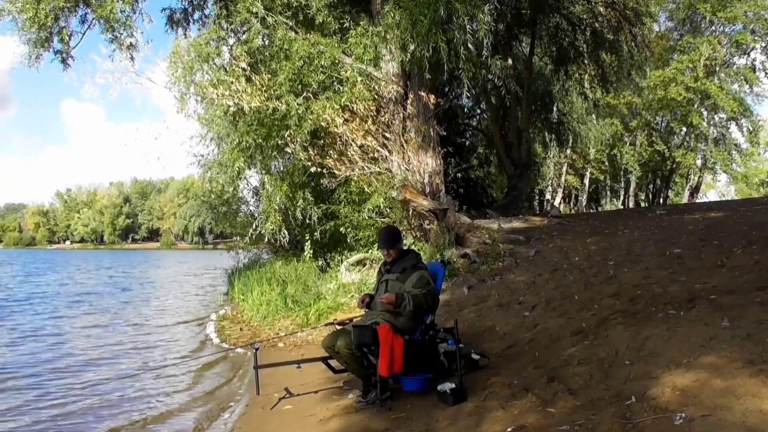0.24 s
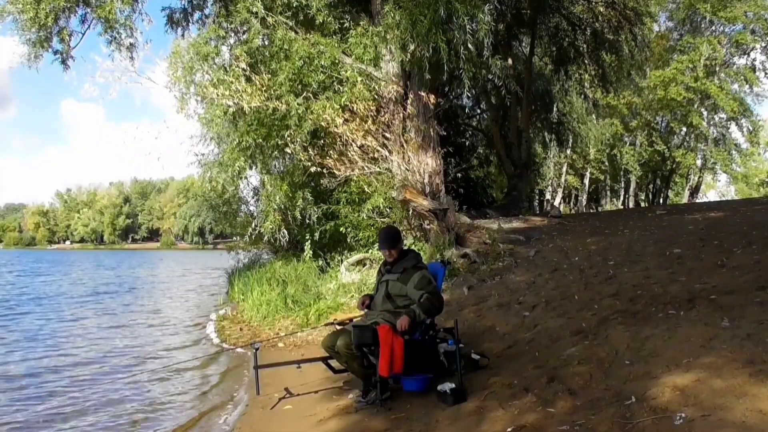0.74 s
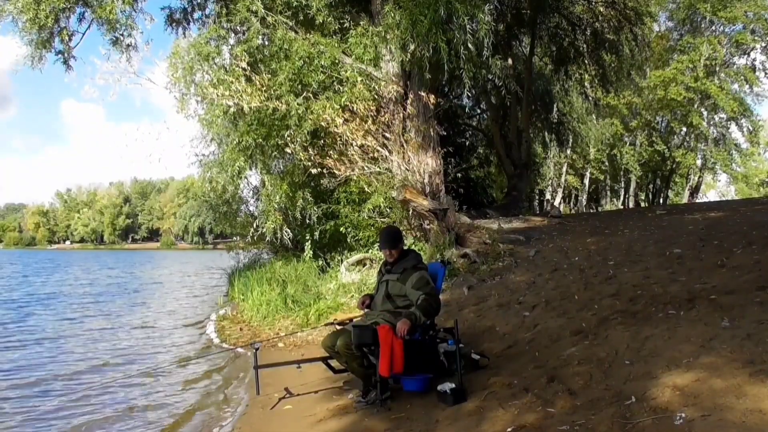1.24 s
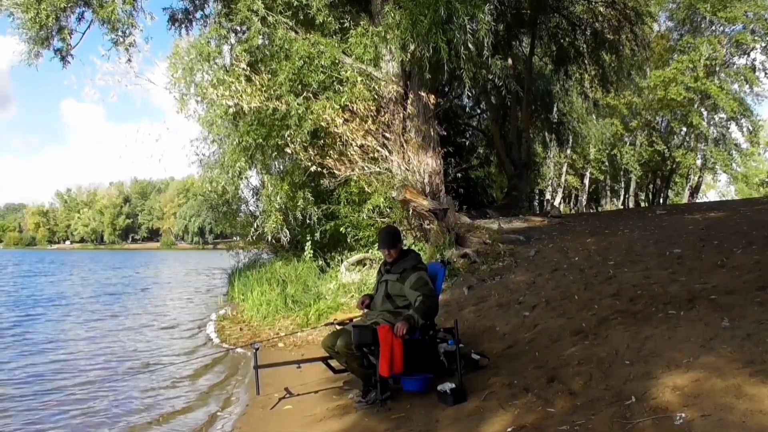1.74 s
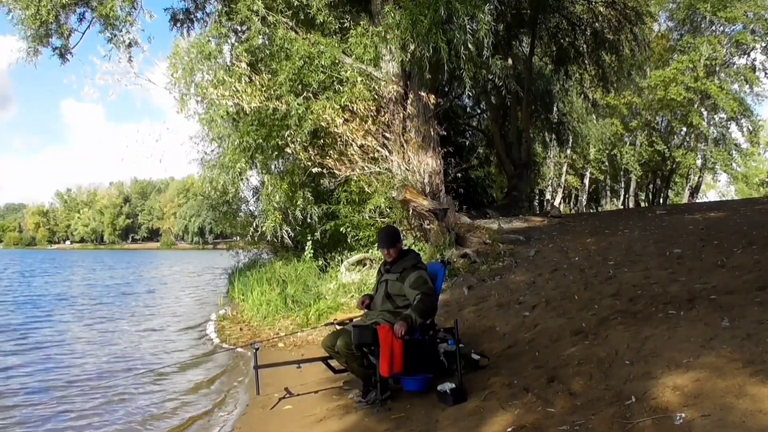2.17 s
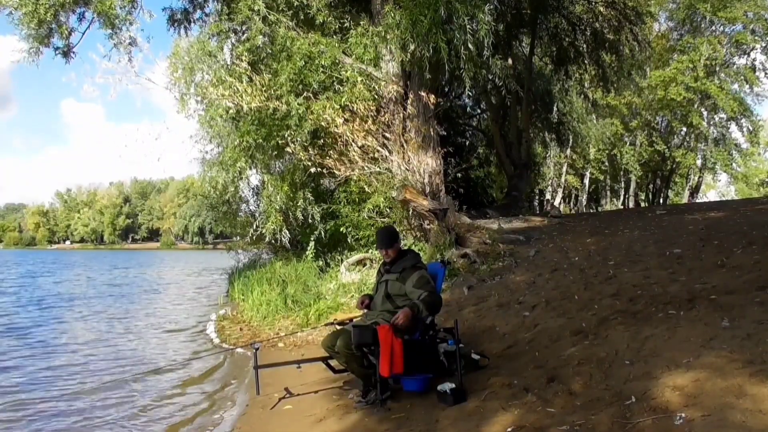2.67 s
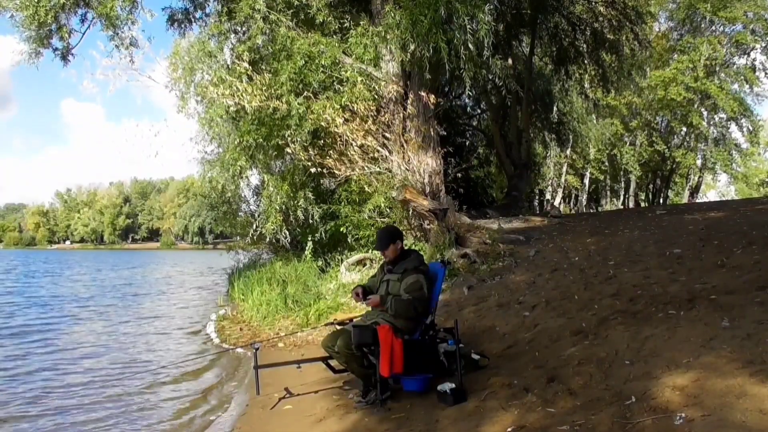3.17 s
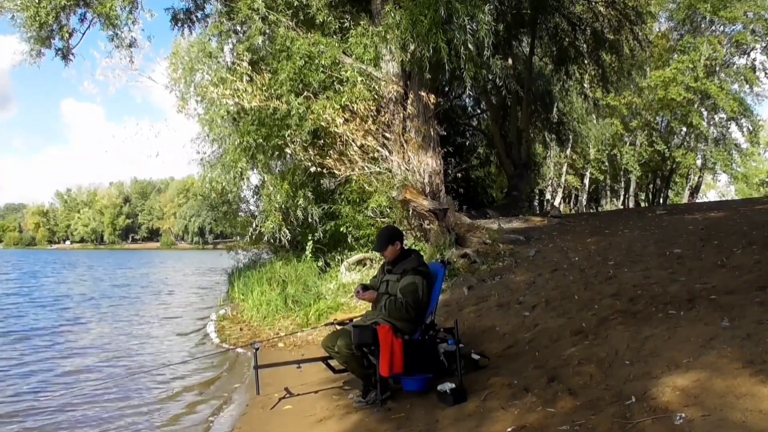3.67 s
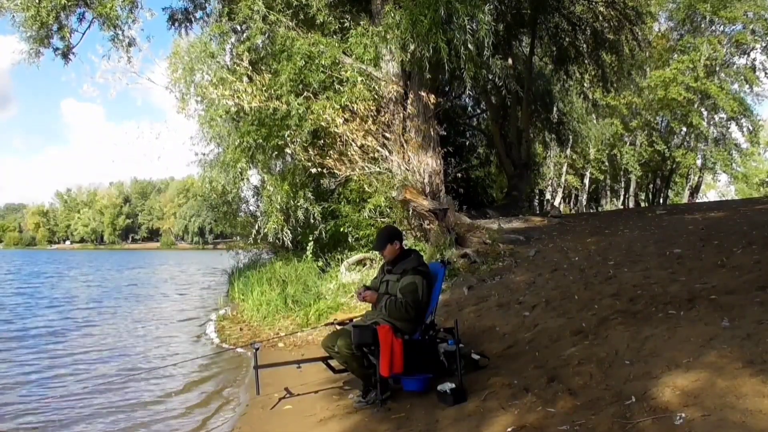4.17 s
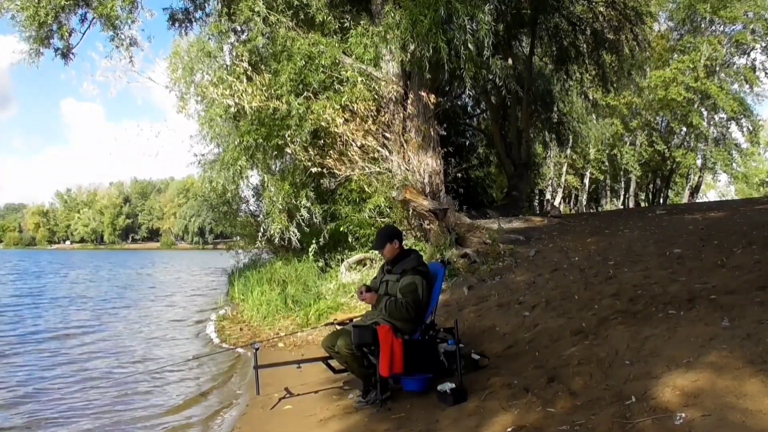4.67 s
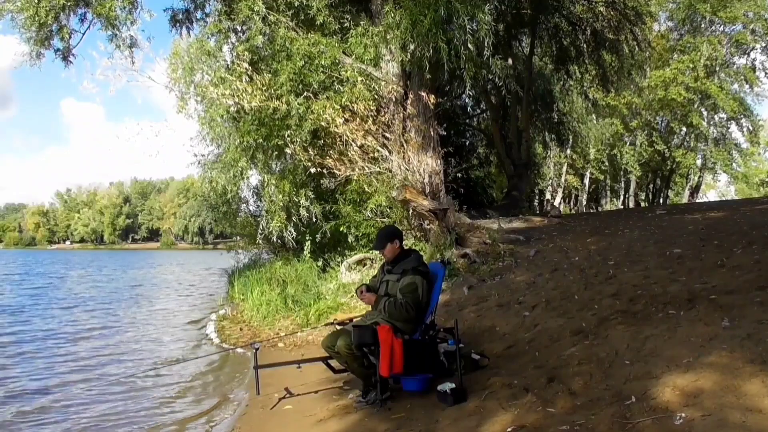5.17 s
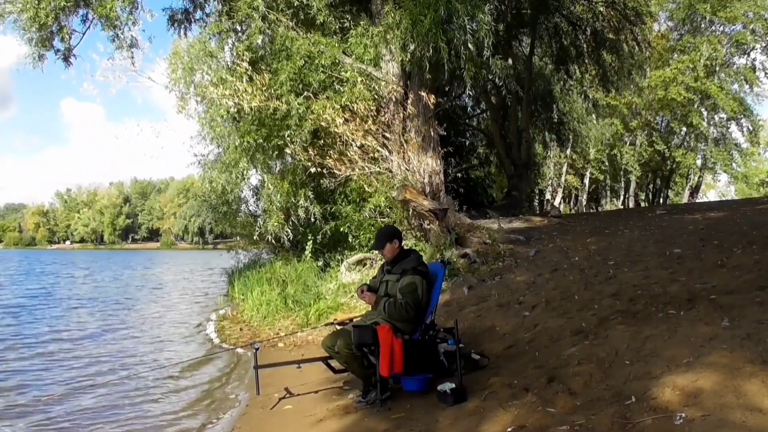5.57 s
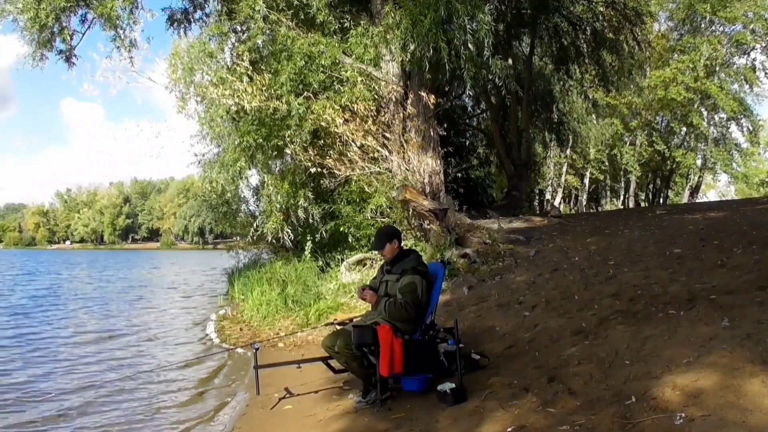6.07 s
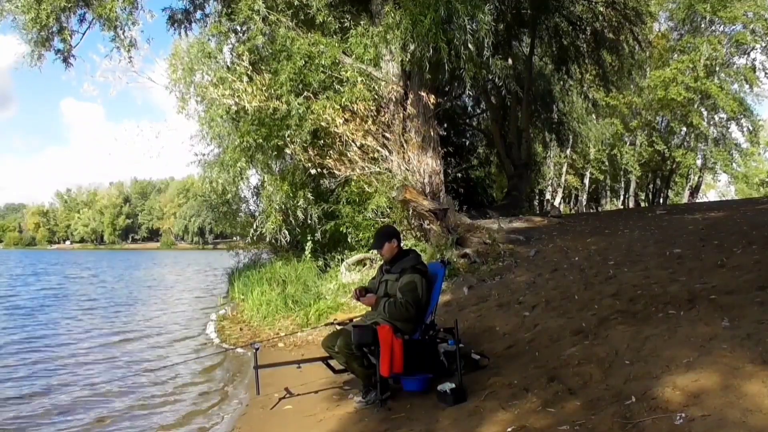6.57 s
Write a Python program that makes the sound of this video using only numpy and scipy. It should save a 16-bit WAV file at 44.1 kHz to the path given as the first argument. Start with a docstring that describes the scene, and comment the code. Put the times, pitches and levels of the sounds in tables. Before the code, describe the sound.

Small waves lap and gurgle on a sandy lake shore while gusts of wind rumble on the microphone. About a second in, a hand works fishing gear right at the microphone, with short rubs, loud knocks and the sharp snap of a catch. After this brief handling, the water and wind carry on, with an occasional light tick of tackle.

```python
"""A sandy lake shore under trees. From the start, wind rumbles on the microphone and small waves
lap the sand: each swells, drains and leaves bubbles and spray. From 0.8 s to 2.6 s a hand works
the gear right at the microphone: it rubs the housing in short strokes, knocks it and snaps a catch.
Light ticks of tackle, heard now and then from the first second, go on over the waves to the end."""
import sys
import numpy as np
from scipy import signal
from scipy.fft import rfft, irfft, next_fast_len
from scipy.io import wavfile
from scipy.ndimage import uniform_filter1d, map_coordinates

SR = 44100
rng = np.random.default_rng(int(sys.argv[2]) if len(sys.argv) > 2 else 0)


def materialize(psi):
    """Save the field psi as 16-bit PCM at rate SR to the path in sys.argv[1].

    A 1-D psi becomes a single channel; in a 2-D psi each row is a channel.
    """
    bounded = np.clip(np.atleast_2d(psi).T, -1, 1)
    quanta = np.round(bounded * 32767).astype(np.int16)
    wavfile.write(sys.argv[1], SR, quanta)


N = 301070


def amp(db):
    """Decibels to gain."""
    return 10 ** (np.asarray(db) / 20)


def unit(x):
    """Scale to rms 1."""
    return x / np.sqrt(np.mean(x ** 2) + 1e-20)


def decay(t, t60):
    """A gain that falls 60 dB in t60 seconds."""
    return np.exp(-np.log(1000) * t / t60)


def wobble(rate):
    """A smooth random curve, rate knots a second."""
    knots = rng.standard_normal(int(N * rate / SR) + 4)
    return map_coordinates(knots, [np.arange(N) * rate / SR])


def grit(rough_db):
    """Noise of rms 1 broken into tiny clumps, as of rough surfaces catching."""
    return unit(rng.standard_normal(N) * amp(rough_db * wobble(700)))


def colour(x, spectrum, modes=()):
    """Causal filter of unit noise gain: a broad spectrum with resonances standing on it."""
    size = 2 * next_fast_len(N // 2 + 8192)
    hz = np.fft.rfftfreq(size, 1 / SR)
    points_hz, db = np.transpose(spectrum)
    power = amp(np.interp(np.log(hz + 1), np.log(points_hz), db)) ** 2
    for centre, width, level in modes:
        power += amp(level) ** 2 / (1 + (2 * (hz - centre) / width) ** 2)
    cepstrum = irfft(np.log(unit(np.sqrt(power)) + 1e-6))
    cepstrum[1:size // 2] *= 2  # minimum phase: nothing rings before its cause
    cepstrum[size // 2 + 1:] = 0
    return irfft(rfft(x, size) * np.exp(rfft(cepstrum)))[:N]


def add(track, s, sound):
    """Mix a sound in at time s."""
    part = track[max(round(s * SR), 0):][:len(sound)]
    part += sound[:len(part)]


# Gusts on the microphone: t/s, level/dB
GUSTS = [(0, -39.5), (1.2, -35.5), (1.6, -33.5), (2.3, -31), (2.9, -39), (3.45, -31), (4.6, -32),
         (5.4, -33), (6.2, -31), (6.83, -35.5)]
# Spectrum of their rumble: f/Hz, level/dB
RUMBLE_SPECTRUM = [(4, -8.5), (10, 2), (20, -1), (35, -12), (60, -19.5), (100, -29.5), (200, -44.5),
                   (400, -55), (1000, -81)]
# Spectrum of trees and open water in the distance: f/Hz, level/dB
DISTANT_SPECTRUM = [(60, -20), (110, -4), (310, -12.5), (650, -20), (1200, -29.5), (4000, -34), (6000, -36),
                    (8500, -32), (11000, -43), (15000, -41)]


def wind():
    """Eddies buffet the microphone over a steady rustle of far trees."""
    gust_db = np.interp(np.arange(N) / SR, *np.transpose(GUSTS)) - 0.5
    eddies_db = 1.6 * wobble(8)
    buffet = amp(gust_db + eddies_db) * unit(colour(rng.standard_normal(N), RUMBLE_SPECTRUM))
    rustle = amp(-55 + 1.6 * wobble(3.1)) * colour(rng.standard_normal(N), DISTANT_SPECTRUM)
    return buffet + rustle


# Light ticks of tackle: t/s, level/dB, f/Hz
TACKLE_TICKS = [(0.364, -33.5, 6350), (0.415, -38, 6800), (0.537, -40, 8600), (0.648, -46, 10800),
                (1.090, -41, 7040), (1.579, -40, 5050), (2.621, -33.5, 7200), (3.088, -40, 7600),
                (3.536, -34, 7300), (3.79, -35.5, 5200), (4.1067, -25, 2040), (4.6147, -32, 9500),
                (6.644, -40, 8400)]


def tackle():
    """Small hard parts touch: a short crack, mostly in one band."""
    out, t = np.zeros(N), np.arange(SR // 16) / SR
    for s, db, hz in TACKLE_TICKS:
        band = signal.butter(2, [hz / 1.22, hz * 1.22], "band", fs=SR, output="sos")
        crack = rng.standard_normal(len(t)) * decay(t, t60=0.012)
        add(out, s, amp(db + 4) * (signal.sosfilt(band, crack) + amp(-27.5) * crack))
    return out


def bubble(t, hz, t60, rise):
    """A damped sine whose pitch climbs as the bubble nears the surface."""
    phase = 2 * np.pi * hz * t * (1 + rise * t / t60 / 2)
    onset = 1 - np.exp(-2 * hz * t)
    return onset * np.sin(phase) * decay(t, t60)


def bubbles(count, centre_hz, octaves, cycles, spread_db, rise, samples):
    """A cloud of random bubbles, rms 1; each dies away in the given number of cycles."""
    start = rng.integers(0, N, (count, 1))
    hz = np.clip(centre_hz * 2 ** (octaves * rng.standard_normal((count, 1))), 280, 14000)
    gain = amp(spread_db * np.minimum(rng.exponential(size=(count, 1)), 3.5))
    rings = gain * bubble(np.arange(samples) / SR, hz, cycles / hz, rise)
    positions = start + np.arange(samples)
    return unit(np.bincount(positions.ravel(), rings.ravel(), N)[:N])


def sloshing(patchy_db):
    """Noise of rms 1 whose pitch regions swell and fade on their own, like water moving in hollows."""
    noise = signal.stft(rng.standard_normal(N), nperseg=512)[2]
    patches = rng.standard_normal(noise.shape)
    for _ in range(2):
        patches = uniform_filter1d(patches, size=5, axis=0)  # across pitch
        patches = uniform_filter1d(patches, size=7, axis=1)  # across time
    return unit(signal.istft(noise * amp(patchy_db * unit(patches)), nperseg=512)[1][:N])


# Wavelets running up the sand: crest t/s, rise/s, flow level/dB, froth/dB re flow
WAVELETS = [(.13, 0.13, -57, 1.5), (.33, 0.081, -52.5, -1), (.56, 0.053, -51, -1.5),
            (.76, 0.078, -52.5, -1), (.98, 0.045, -53, 0.5), (1.15, 0.041, -51.5, -4.5),
            (1.42, 0.11, -50.5, 0), (1.68, 0.11, -45.5, -2.5), (2.25, .05, -49, -0.5),
            (2.46, 0.091, -49, -13), (2.63, 0.019, -56, -6), (2.76, .03, -61, 6), (2.94, 0.051, -58, 6),
            (3.08, 0.069, -48.5, -3.5), (3.23, .04, -53.5, -4), (3.42, 0.026, -59, -1),
            (3.79, 0.12, -56, 4.5), (4.05, 0.089, -52, -5.5), (4.47, 0.043, -59, -1.5),
            (4.68, .04, -59.5, 0.5), (4.84, 0.045, -58.5, -1.5), (5.33, .04, -63, 3.5),
            (5.52, 0.072, -54, -0.5), (5.93, 0.03, -57.5, 3), (6.09, .04, -56.5, -3.5),
            (6.34, 0.099, -55.5, 1), (6.49, 0.042, -56.5, -0.5), (6.78, 0.031, -63.5, 5.5)]


def lapping(ripple_db=-65.5, drain_db_per_s=48):
    """Gains of flow and froth: each wavelet swells to its crest and drains away over a faint ripple."""
    t = np.arange(N) / SR
    flow_power, froth_power = np.full((2, N), amp(ripple_db) ** 2)
    for crest, rise, db, froth_db in WAVELETS:
        swell = np.exp(-(np.minimum(t - crest, 0) / rise) ** 2 / 2)
        drained_db = drain_db_per_s * np.maximum(t - crest, 0)
        power = (swell * amp(db - drained_db)) ** 2
        flow_power += power
        froth_power += power * amp(froth_db) ** 2
    return np.sqrt(flow_power), np.sqrt(froth_power)


# Spectra of the wash and the spray at the waterline: f/Hz, level/dB
WASH_SPECTRUM = [(150, -23), (300, -0.5), (520, 5), (750, 5), (1100, -7.5), (2000, -11.5), (3500, -15),
                 (6000, -29.5), (12000, -34)]
SPRAY_SPECTRUM = [(1500, -7), (3500, -3.5), (6000, -1.5), (8700, 6), (10500, -3.5), (15000, -15)]


def waves():
    """Each wavelet washes over the sand, traps clusters of bubbles and throws fine spray."""
    flow, froth = lapping()
    wash = colour(sloshing(patchy_db=4.5), WASH_SPECTRUM)
    gurgle = bubbles(1200, centre_hz=950, octaves=0.55, cycles=50, spread_db=4, rise=0.55, samples=4000)
    fizz = bubbles(1700, centre_hz=1850, octaves=0.55, cycles=36, spread_db=4, rise=0.36, samples=1800)
    drops = bubbles(3000, centre_hz=6500, octaves=0.5, cycles=28, spread_db=5, rise=0.06, samples=500)
    spray = amp(-11) * drops + amp(-12) * colour(grit(rough_db=10.5), SPRAY_SPECTRUM)
    return flow * (amp(-1) * wash + amp(-5) * gurgle) + froth * (amp(-4.5) * fizz + spray)


# Single large bubbles at the water's edge: t/s, f/Hz, level/dB
AIR_POCKETS = [(0.072, 2500, -29.5), (0.298, 504, -35), (0.437, 1116, -36.5), (1.172, 616, -38),
               (1.712, 1410, -29.5), (2.394, 502, -37), (2.46, 954, -32), (2.679, 660, -38),
               (3.028, 356, -40), (3.125, 1024, -39), (3.222, 1177, -37.5), (3.427, 619, -41),
               (3.457, 1065, -36.5), (3.685, 468, -38), (3.793, 1017, -38.5), (3.898, 517, -38.5),
               (4.042, 835, -36), (4.141, 458, -38.5), (4.357, 810, -43), (4.628, 539, -35),
               (5.358, 474, -33), (5.515, 490, -35), (6.087, 672, -38.5), (6.478, 1650, -38.5),
               (6.484, 718, -39), (6.773, 462, -42)]


def plops(ring_cycles=42, swell_cycles=1.9, flutter_db=3.5):
    """A pocket of air rings where a wavelet folds over, then sheds a chain of smaller, higher bubbles."""
    out, t = np.zeros(N), np.arange(SR // 5) / SR
    for s, hz, db in AIR_POCKETS:
        t60 = ring_cycles / hz
        swell = 1 - np.exp(-hz * t / swell_cycles)  # the pocket closes gradually
        add(out, s, amp(db + 2) * swell * bubble(t, hz, t60, rise=0.394))
        for lag, scatter in zip(rng.uniform(0.102, 1, size=4), rng.standard_normal(size=4)):
            pitch_ratio = 2 ** (0.8 * lag + 0.1 * scatter)
            shed = bubble(t, hz * pitch_ratio, t60 / pitch_ratio, rise=0.2)
            add(out, s + 0.8 * lag * t60, amp(db - 10 - 20 * lag) * shed)
    return out * amp(flutter_db * wobble(150))  # the moving surface shakes the ring


# Hard pushes felt through the microphone's mount: t/s, f/Hz, level/dB, t60/s
MOUNT_THUMPS = [(0.895, 266, -10.5, 0.042), (1.522, 476, -21.5, 0.13), (2.0117, 200, -9.5, .08),
                (2.0276, 214, -15.5, 0.097), (2.0285, 604, -19.5, 0.12), (2.5406, 463, -21.5, 0.096),
                (2.542, 770, -14.5, 0.053)]


def thumps(rise_cycles=0.31):
    """The mount takes a moment to get moving after a hard push, then rocks briefly."""
    out, t = np.zeros(N), np.arange(SR // 5) / SR
    for s, hz, db, t60 in MOUNT_THUMPS:
        onset = 1 - np.exp(-hz * t / rise_cycles)
        add(out, s, amp(db) * onset * np.sin(2 * np.pi * hz * t) * decay(t, t60))
    return out


# Fingers on the housing, right at the microphone: t/s, length/s, level/dB, treble/dB re level
FINGER_STROKES = [(.85, 0.024, -33.5, -19), (1.219, 0.07, -34.5, -9.5), (1.477, 0.032, -35, -16),
                  (1.628, .05, -40, -14), (1.779, 0.18, -49.5, -6.5), (1.89, 0.026, -47, -8.5),
                  (2.05, 0.062, -40.5, -12.5), (2.439, 0.057, -45.5, -13), (2.536, .04, -51, 1)]


def strokes(attack_s=0.0058, release_s=0.016):
    """Gains of rub and scrape: each stroke of the fingers takes hold, slides evenly and lets go."""
    start, length, db, treble_db = np.transpose(FINGER_STROKES)[:, :, None]
    age = np.arange(N) / SR - start
    grip = amp(db) * np.exp(np.minimum(age, 0) / attack_s - np.maximum(age - length, 0) / release_s)
    return np.array([grip.sum(0), (grip * amp(treble_db)).sum(0)])


# Knocks on the gear, right at the microphone: t/s, level/dB, treble/dB re level
GEAR_KNOCKS = [(0.8335, -27.5, -13), (0.893, -19.5, -8), (0.9015, -18.5, -12), (0.922, -25.5, -23),
               (1.0447, -31, -15), (1.295, -31, -18), (1.511, -25, -8), (1.5215, -15, -4.5),
               (1.531, -22.5, -27), (1.866, -30.5, -15), (1.9819, -25.5, -3.5), (1.991, -21, -9),
               (2.0121, -14.5, 5), (2.028, -16, 3.5), (2.0396, -14.5, -13), (2.079, -29, -32),
               (2.13, -34.5, -10), (2.452, -40.5, 2), (2.464, -43, 1), (2.5407, -21.5, -13),
               (2.554, -29.5, -16)]
# Spectra of a contact's dull body and scratchy edge: f/Hz, level/dB
BODY_SPECTRUM = [(60, -20.5), (150, -17), (270, -3), (380, -7), (800, -2.5), (1200, -12.5), (2500, -18.5),
                 (5000, -19), (9000, -33.5), (15000, -54)]
EDGE_SPECTRUM = [(500, -28.5), (2000, -2.5), (4000, -3.5), (5500, -7.5), (7500, 1.5), (9300, -0.5),
                 (10300, -11), (15000, -13)]
# Resonances of the housing and the catch: f/Hz, width/Hz, level/dB
HOUSING_MODES = [(478, 76, 0), (610, 60, -8), (753, 28, 3.5), (910, 78.9, 0.5), (1342, 200, -5.5),
                 (1616, 20, -8.5), (2146, 200, -6.5), (3660, 285, -14)]
CATCH_MODES = [(3040, 43, 8.5), (4000, 260, -3), (6400, 500, -6), (7400, 200, -4.5), (8000, 150, 5),
               (8750, 65.3, 5), (8760, 49, 2), (9240, 230, 4)]


def handling(knock_t60_s=0.086, reference_db=-23, halving_db=29.5):
    """Close knocks and rubbing are crowds of tiny contacts that ring the housing and the catch."""
    body_power, edge_power, cracks = np.zeros((3, N))
    t = np.arange(SR // 4) / SR
    for s, db, treble_db in GEAR_KNOCKS:
        t60 = knock_t60_s * 2 ** ((reference_db - db) / halving_db)  # a firmer contact is damped sooner
        blow = amp(db) * decay(t, t60)
        add(body_power, s, blow ** 2)
        add(edge_power, s, (blow * amp(treble_db)) ** 2)
        add(cracks, s, [amp(db + treble_db + 9)])  # the first touch is one clean impulse
    rub, scrape = strokes() * amp(1.5 * wobble(70))
    scrape *= amp(1.5 * wobble(250))  # the skin sticks and slips
    body = np.sqrt(body_power + rub ** 2) * grit(rough_db=1.5)
    edge = np.sqrt(edge_power + scrape ** 2) * grit(rough_db=3.5) + cracks
    return colour(body, BODY_SPECTRUM, HOUSING_MODES) + colour(edge, EDGE_SPECTRUM, CATCH_MODES)


def scene():
    """Water, hand, tackle and wind at one microphone on the shore."""
    return (waves() + plops() + handling() + thumps() + tackle() + wind())[None]


def record(dry, ceiling=0.9, top_hz=15800, skirt_hz=700):
    """The camera rounds off the hardest peaks and keeps nothing above its band limit."""
    rounded = dry / (1 + np.abs(dry / ceiling) ** 4) ** (1 / 4)
    size = next_fast_len(N + SR // 4)
    hz = np.fft.rfftfreq(size, 1 / SR)
    passband = np.clip((top_hz - hz) / skirt_hz, 0, 1) ** 2
    return irfft(rfft(rounded, size) * passband, size)[:, :N]


dry = scene()
out = record(dry)
materialize(out)
```